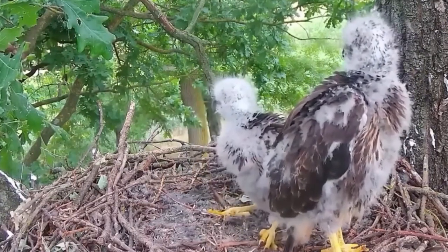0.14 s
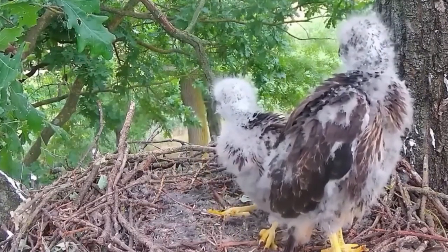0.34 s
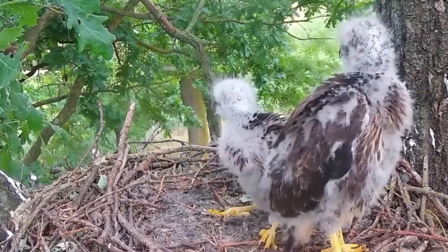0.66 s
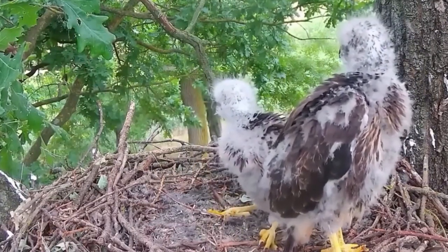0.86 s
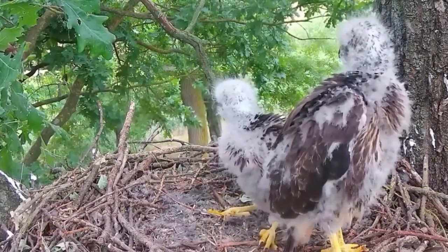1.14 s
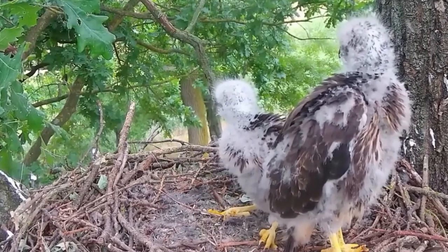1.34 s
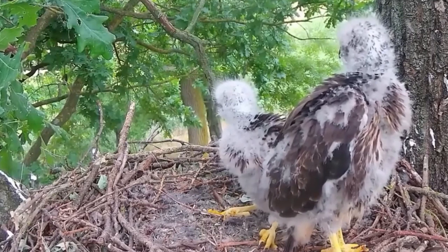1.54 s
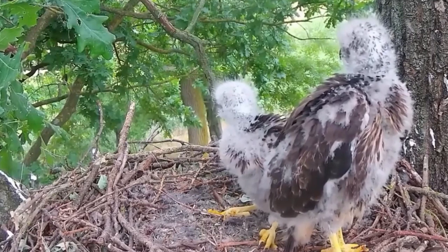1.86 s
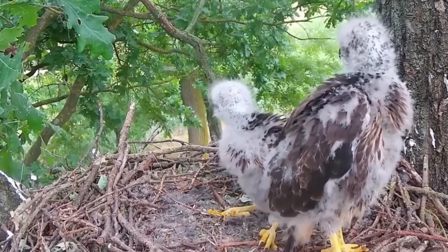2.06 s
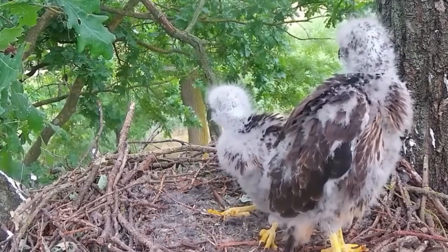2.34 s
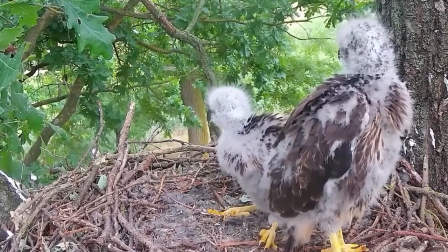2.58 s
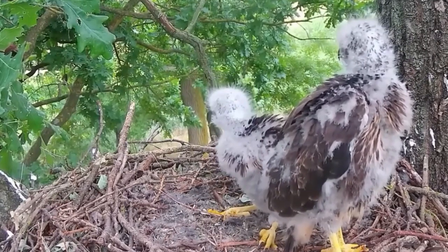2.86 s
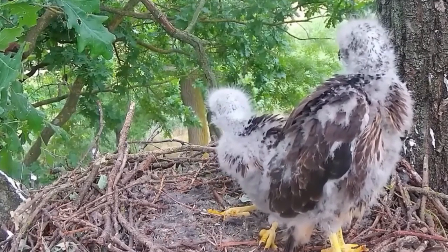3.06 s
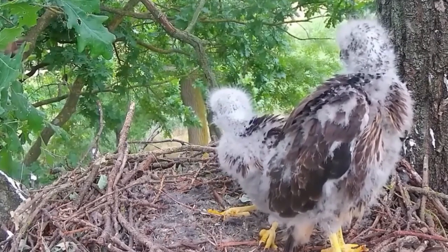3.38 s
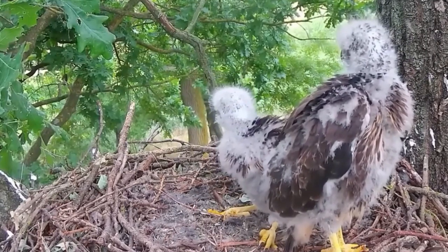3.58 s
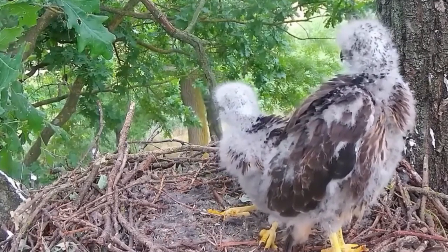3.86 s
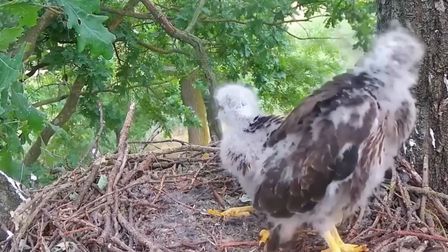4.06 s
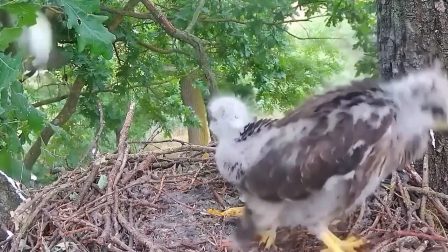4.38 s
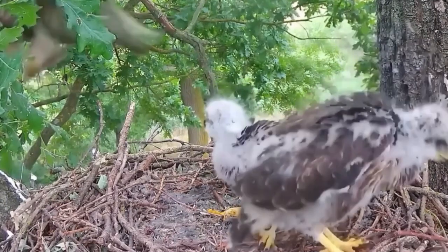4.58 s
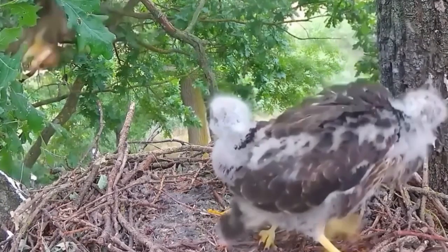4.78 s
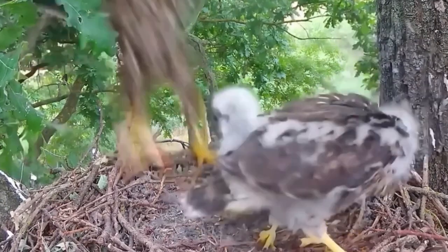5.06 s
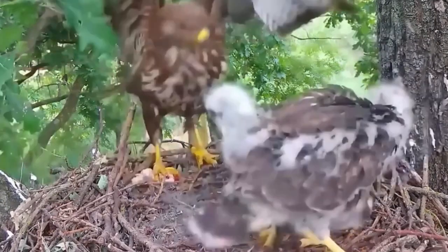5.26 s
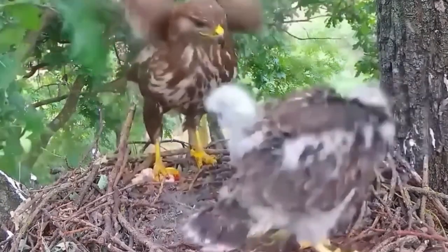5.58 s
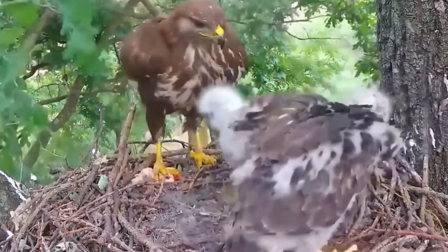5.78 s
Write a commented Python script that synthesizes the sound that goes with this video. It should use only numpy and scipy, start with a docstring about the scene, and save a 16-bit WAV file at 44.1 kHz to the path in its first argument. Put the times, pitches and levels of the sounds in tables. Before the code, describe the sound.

Close to a small microphone at a treetop nest, young birds of prey give piercing, wheezy begging whistles and quick peeps, in runs with brief pauses. The whistles first end in falling notes, later in rough squeals. The calling gets more urgent as a parent arrives with a faint rumble of wing air, cracking twigs and two soft, dull knocks. A faint hiss of distant leaves continues throughout.

```python
"""Thin whistles and short peeps, very close: two raptor chicks beg in a stick nest high in a tree.
One draws long whistles that rise, hold, then break downwards, later into a hoarse squeal.
Breath hisses under the calls; twigs crack and the nest knocks dully as a parent lands.
The small microphone at the nest picks up wing gusts, a short echo off leaves and trunk,
and quiet woodland behind."""
import sys
import numpy as np
from scipy import signal
from scipy.io import wavfile

SR = 44100
rng = np.random.default_rng(int(sys.argv[2]) if len(sys.argv) > 2 else 0)


def materialize(psi):
    """Save the field psi as 16-bit PCM at rate SR to the path in sys.argv[1].

    A 1-D psi becomes a single channel; in a 2-D psi each row is a channel.
    """
    bounded = np.clip(np.atleast_2d(psi).T, -1, 1)
    quanta = np.round(bounded * 32767).astype(np.int16)
    wavfile.write(sys.argv[1], SR, quanta)


N = 261513

CAPSULE_HZ, CUTOFF_HZ = 6200, 14100   # the microphone's treble step; the very top of the sound
ATTACK_S, SCOOP_S = 0.005, 0.007   # soft opening of a sound; quick scoop up to a pitch


def whistles(jitter, shimmer_db):
    """A chick's whistle is a near sine with trembling pitch and level; returns tone and octave."""
    tone, octave = np.zeros(N), np.zeros(N)
    for at, edge, hz, level_db in [*high_notes(), *low_notes()]:
        strain = (hz / 5500) ** 2   # high notes are the least steady
        phase = phase_of(hz * (1 + strain * jitter * wobble(len(hz), rate_hz=48.6)))
        tremble_db = strain * shimmer_db * wobble(len(hz), rate_hz=650)
        height = np.sqrt(2) * edge * from_db(level_db + tremble_db)
        add(tone, at, height * np.sin(phase))
        add(octave, at, height * np.sin(2 * phase))
    return tone, octave


def high_notes(climb_db_per_khz=-3, plunge_db=-15, swell_hz=300, waver_db=3.5):
    """Each note climbs to its held pitch, drifts, and may end in a steepening plunge."""
    # high whistled notes: start t/s, end t/s, climb depth/Hz, climb time/s, held f/Hz, end f/Hz,
    # plunge depth/Hz, plunge time/s, held level/dB, end level/dB
    notes = [ (0.488, 0.883, 1857.5, 0.021, 5186, 6084, 2884, 0.011, -27, -31),
             (1.333, 1.537, 1808, 0.035, 5520, 5890, -1, 0.01, -26.5, -35.5),
             (1.561, 1.74, 13, 0.018, 5450, 5770, 2399, 0.012, -25, -15.5),
             (2.203, 2.564, 1941.5, 0.024, 5290, 5500, 2395, 0.009, -22, -29.5),
             (3.066, 3.412, 1954, 0.037, 5214, 5640, -7, 0.01, -24, -29),
             (3.411, 3.497, 502, 0.01, 6320, 5960, 3103.5, 0.013, -27.5, -35),
             (3.9, 4.131, 1752, 0.037, 5030, 5750, -5, 0.01, -23, -28),
             (4.128, 4.278, 4, 0.02, 5480, 5305, 2197, 0.009, -30, -25.5),
             (5.155, 5.317, 1405, 0.021, 5250, 5490, -1, 0.01, -24, -43),
             (5.303, 5.543, 121, 0.029, 5430, 5117, 1895, 0.006, -22, -13.5), ]
    for start, end, climb_hz, climb_s, hold_hz, end_hz, plunge_hz, plunge_s, hold_db, end_db in notes:
        at, edge, t = call_window(start, end, fade_s=0.00036)
        progress = t / (end - start)
        below = climb_hz * np.exp(-t / climb_s)
        plunge = plunge_hz * np.exp(-(end - start - t) / plunge_s)
        hz = hold_hz + (end_hz - hold_hz) * progress - below - plunge
        held_db = hold_db + (end_db - hold_db) * progress + climb_db_per_khz * below / 1000
        swell = np.tanh((plunge / swell_hz) ** 4)   # as the pitch gives way, the level goes to plunge_db
        drift_db = (1 - swell) * waver_db * wobble(len(t), rate_hz=12)
        level_db = held_db + (plunge_db - held_db) * swell + throat_db(hz) + drift_db
        yield at, edge * np.clip(t / ATTACK_S, 0, 1), hz, level_db


def low_notes(shelf_hz=3747, scoop_hz=278, sag_hz_per_s=3000, fall_loss_db=6):
    """Each note scoops up to a sagging shelf of pitch, then slides down, coloured by the throat."""
    # clear notes after a break: start t/s, fall t/s, end t/s, end f/Hz, bend of the fall, level/dB
    notes = [(-0.04, 0.062, 0.088, 2850, 1.2, -19), (0.886, 0.965, 1.04, 2100, 1.3, -14),
             (1.741, 1.815, 1.89, 2060, 1.2, -15.5), (2.565, 2.668, 2.698, 2700, 1.2, -14)]
    for start, knee, end, end_hz, bend, level_db in notes:
        at, edge, t = call_window(start, end, fade_s=0.0026)
        fall = np.clip((t + start - knee) / (end - knee), 0, 1)
        shelf = shelf_hz - scoop_hz * np.exp(-t / SCOOP_S) - sag_hz_per_s * t
        hz = shelf + (end_hz - shelf) * fall ** bend
        yield at, edge, hz, level_db - fall_loss_db * fall + throat_db(hz)


def throat_db(hz):
    """Throat and beak lift or dim a note as it glides through their resonances."""
    # peaks and a notch: centre f/Hz, width/Hz, gain/dB
    resonances = [(2580, 150, 5), (4200, 280, 11), (4880, 170, -9)]
    return sum(gain_db * np.exp(-((hz - centre) / width) ** 2) for centre, width, gain_db in resonances)


def squeals(jitter, shimmer_db, hiss_db):
    """The syrinx drops to low, uneven cycles whose fluttering partials take turns to lead."""
    # hoarse turns: t/s, length/s, start f/Hz, end f/Hz, voicing, roughness 0-1, level/dB
    turns = [ (2.696, 0.047, 1320, 1055, "middle", 0.02, -10), (3.497, 0.057, 1250, 1090, "upper", .6, -12),
             (3.554, 0.06, 1330, 1060, "middle", .4, -9), (4.276, 0.02, 1200, 1050, "upper", .6, -10),
             (4.296, 0.02, 1230, 1040, "middle", 1, -8), (4.752, 0.008, 1150, 1000, "upper", .6, -8),
             (4.759, 0.016, 1170, 1000, "middle", 1, -6), (5.047, 0.018, 1170, 1010, "middle", 1, -9),
             (5.543, 0.023, 1190, 1185, "upper", .4, -9), (5.566, 0.038, 1240, 1250, "middle", .9, -11),
             (5.604, 0.034, 1205, 1110, "upper", .5, -12), (5.638, 0.118, 1300, 1215, "middle", 1, -9.5),
             (5.756, 0.022, 1170, 1160, "even", .8, -12.5), (5.778, 0.025, 1200, 1210, "even", .9, -16.5),
             (5.803, 0.025, 1130, 1000, "even", .8, -15), ]
    # by voicing: partials 1-4 at full roughness, level/dB relative to the turn
    voicings = {"upper": (-20, -15, 0, -24), "middle": (-10, 0, -15, -20), "even": (0, -1, -4, -18)}
    # by voicing: exponent that sets how late the pitch gives way
    droop_bend = {"upper": 3.5, "middle": 1.61, "even": 1.5}
    # by voicing: share of the pitch missing at the start
    scoop = {"upper": 0.06, "middle": 0, "even": 0}
    # by voicing: loss/dB over one turn
    loss_db = {"upper": 0, "middle": 7, "even": 3}
    out, effort = np.zeros(N), np.zeros(N)
    for start, length, start_hz, end_hz, voicing, rough, turn_db in turns:
        at, edge, t = call_window(start, start + length, fade_s=0.0025)
        hz = start_hz + (end_hz - start_hz) * (np.maximum(t, 0) / length) ** droop_bend[voicing]
        hz = hz * (1 - scoop[voicing] * np.exp(-t / SCOOP_S))
        phase = phase_of(hz * (1 + rough * jitter * wobble(len(t), rate_hz=215)))
        fading_db = turn_db - loss_db[voicing] * t / length
        for k, side_db in enumerate(voicings[voicing], 1):
            # side partials grow with roughness and rasp more than the leading one
            partial_db = side_db + 20 * np.log10(rough) if side_db else 0
            flutter_db = rough * shimmer_db * wobble(len(t), rate_hz=62)
            height = np.sqrt(2) * edge * from_db(fading_db + partial_db + flutter_db)
            rasp = (.7 if side_db else .33 * rough) * wobble(len(t), rate_hz=210)
            add(out, at, height * (1 + rasp) * np.sin(k * phase))
            add(effort, at, rough * height)
    turbulence = from_db(hiss_db) * effort * rms_one(band(rng.standard_normal(N), 1500, 4600))
    return band(out + turbulence, 900, CAPSULE_HZ, order=4)   # the small body radiates no bass


def peeps(shimmer_db, jitter, lean, throat_share):
    """Each peep is one straight glide under a swell that opens faster than it closes."""
    # short peeps: t/s, length/s, start f/Hz, end f/Hz, level/dB
    glides = [(0.096, 0.014, 4290, 2910, -22), (0.193, 0.035, 3450, 4290, -32),
              (0.395, 0.034, 2680, 2890, -24), (0.39, 0.038, 3570, 5520, -22.5),
              (0.485, 0.057, 3350, 3520, -20), (0.68, 0.019, 2900, 3080, -19.5),
              (0.434, 0.01, 3740, 4750, -29), (0.522, 0.037, 3380, 2760, -24.5),
              (0.556, 0.03, 2400, 2920, -28.5), (0.703, 0.048, 2370, 2805, -28.5),
              (0.782, 0.016, 4270, 3730, -27.5), (1.932, 0.076, 2417, 2910, -31),
              (2.028, 0.078, 2820, 3220, -31), (2.577, 0.067, 2280, 2930, -29.5),
              (3.29, 0.042, 4230, 3620, -31), (1.279, 0.035, 4840, 3270, -29.5),
              (1.622, 0.022, 2600, 3700, -19), (1.648, 0.02, 2660, 3600, -21),
              (1.57, 0.085, 4050, 4350, -29), (1.677, 0.032, 3440, 5100, -28),
              (1.93, 0.017, 3730, 5260, -24), (2.001, 0.038, 3626, 2420, -18.5),
              (2.363, 0.081, 3700, 4990, -25), (3.006, 0.052, 3510, 5270, -25),
              (3.191, 0.03, 4390, 4580, -28), (3.194, 0.046, 2860, 3015, -20),
              (3.396, 0.028, 3720, 5300, -21.5), (3.674, 0.034, 3480, 5500, -25),
              (3.9, 0.081, 2810, 3516, -18), (3.985, 0.017, 3860, 4700, -22.5),
              (4.12, 0.1, 2740, 3480, -21), (4.201, 0.027, 3790, 4850, -23),
              (4.469, 0.027, 3240, 5740, -20.5), (4.522, 0.053, 3094, 5270, -18),
              (4.566, 0.026, 4930, 3500, -20.5), (4.647, 0.022, 3470, 5240, -16),
              (4.614, 0.037, 5500, 6800, -29), (4.737, 0.02, 5390, 3145, -12),
              (4.845, 0.028, 3260, 5500, -24), (4.906, 0.011, 5320, 3200, -19.5),
              (4.915, 0.03, 3206, 5110, -14), (5.009, 0.03, 3470, 5300, -18),
              (5.03, 0.018, 6270, 2920, -8.5), (5.08, 0.0097, 4450, 3000, -18),
              (5.249, 0.3, 3397, 3535, -29.5), (5.361, 0.01, 3520, 4400, -18),
              (5.848, 0.018, 4300, 3030, -26)]
    out = np.zeros(N)
    for start, length, start_hz, end_hz, level_db in glides:
        progress = np.linspace(0, 1, int(length * SR))
        hz = start_hz + (end_hz - start_hz) * progress
        hz = hz * (1 + jitter * wobble(len(hz), rate_hz=300))
        tremble_db = shimmer_db * wobble(len(hz), rate_hz=430)
        height = np.sqrt(2) * from_db(level_db + throat_share * throat_db(hz) + tremble_db)
        swell = np.sin(np.pi * progress ** lean)
        add(out, int(start * SR), height * swell * np.sin(phase_of(hz)))
    return out


def breath(spread):
    """Each wheeze is noise in three neighbouring windpipe resonances that flare on their own."""
    # wheezes under the calls: t/s, length/s, centre f/Hz, level/dB of each resonance
    wheezes = [(0.369, 0.11, 3370, -39.5), (0.5, 0.405, 3570, -37.5), (1.612, 0.3, 3320, -36),
               (1.917, 0.15, 3380, -37.5), (2.238, 0.51, 4960, -45), (3.105, 0.32, 3180, -39),
               (3.914, 0.19, 3820, -38.5), (4.092, 0.23, 4460, -30.5), (4.591, 0.21, 4880, -31.5),
               (5.187, 0.43, 3950, -34), (1.534, 0.053, 5370, -40), (3.131, 0.091, 5060, -31),
               (3.466, 0.068, 4640, -31), (4.132, 0.19, 6200, -34), (4.63, 0.135, 6200, -38)]
    out, half_band = np.zeros(N), np.sqrt(spread)
    for start, length, hz, level_db in wheezes:
        size = int(length * SR)
        swell = np.abs(np.sin(np.linspace(0, np.pi, size))) ** 0.43
        for centre in (hz / spread, hz, hz * spread):
            noise = rms_one(band(rng.standard_normal(size), centre / half_band, centre * half_band))
            flare_db = 4 * wobble(size, rate_hz=25)
            add(out, int(start * SR), swell * from_db(level_db + flare_db) * noise)
    return out


def twigs(t60_s):
    """Twigs crack under claws beside the microphone: bursts of grainy noise that die fast."""
    # cracks: t/s, level/dB ahead of the band filter
    cracks = [(1.554, -26.5), (3.893, -10), (4.99, -24.5), (5.19, -16.5), (5.214, -14), (5.234, -15.5)]
    out, t = np.zeros(N), np.arange(SR // 8) / SR
    for start, level_db in cracks:
        grains = rng.standard_normal(len(t)) * from_db(3.3 * wobble(len(t), rate_hz=74))
        add(out, int(start * SR), from_db(level_db - 60 * t / t60_s) * grains)
    return band(out, 870, 3500)


def knocks():
    """The parent's feet land and ring the low modes of the nest with a soft, dull knock."""
    # footfalls: t/s, level/dB of each mode
    footfalls = [(5.234, -32), (5.612, -31)]
    # modes of the stick nest: f/Hz, t60/s
    modes = [(205, 0.09), (430, 0.16)]
    out, t = np.zeros(N), np.arange(SR // 8) / SR
    for start, level_db in footfalls:
        ring = sum(from_db(level_db - 60 * t / t60) * np.sin(2 * np.pi * hz * t) for hz, t60 in modes)
        add(out, int(start * SR), ring * np.clip(t / ATTACK_S, 0, 1))
    return out


def canopy(x, echo_db, t60_s):
    """Dense scattered echoes from the trunk, branches and leaves around the nest."""
    t = np.arange(SR // 2) / SR
    tail = rng.standard_normal(len(t)) * from_db(-60 * t / t60_s) * np.clip(t / 0.014, 0, 1)
    tail = band(tail, 2400, CAPSULE_HZ)   # leaves scatter only the short waves
    return from_db(echo_db) * signal.fftconvolve(x, tail / np.sqrt(np.sum(tail ** 2)))[:N]


def capsule(x, overload):
    """The capsule overloads and loses treble above the whistles; returns sound and excess peaks."""
    excess = x - np.clip(x, -overload, overload)
    clipped = x - signal.sosfilt(signal.butter(1, 500, "high", fs=SR, output="sos"), excess)
    return signal.sosfilt(signal.butter(10, CAPSULE_HZ, fs=SR, output="sos"), clipped), excess


def sheen(octave, peaks, wheeze, sheen_db, crackle_over_sheen_db):
    """A faint sheen an octave above the whistles, a crackle on the loudest peaks, a breathy high hiss."""
    crackle = from_db(crackle_over_sheen_db) * peaks
    hiss = from_db(-5) * band(wheeze, CAPSULE_HZ, 8000)
    return from_db(sheen_db) * band(octave + crackle, 9000, CUTOFF_HZ) + hiss


def gusts():
    """Air stirred by wings rumbles in lumps on the capsule."""
    # course of the rumble: t/s, level/dB
    course = [(0, -60), (3.7, -57.5), (4.6, -45.5), (5.2, -51)]
    gain = from_db(np.interp(np.arange(N) / SR, *np.transpose(course)))
    rumble = band(rng.standard_normal(N), 12, 45)
    lumps = from_db(5 * wobble(N, rate_hz=6))
    return gain * rms_one(rumble * lumps)


def woods(level_db, flicker_db):
    """Distant leaves and microphone hiss: half-octave noise bands that flicker a little."""
    # colour of the background: f/Hz, relative level/dB
    spectrum = [(20, -17), (100, -5), (450, -7), (1600, -9.5), (3500, -8.5), (5500, -27.5), (7000, -9.5),
                (9000, -27), (13000, -20)]
    hz, colour_db = np.transpose(spectrum)
    edges = 20 * 2 ** np.arange(0, 9.6, .5)
    out, white = np.zeros(N), rng.standard_normal((2, N))
    for k, (low, high) in enumerate(zip(edges, edges[1:])):
        band_db = np.interp(np.log(low * high) / 2, np.log(hz), colour_db)
        out += from_db(band_db + flicker_db * wobble(N, rate_hz=10.7)) * band(white[k % 2], low, high)
    return from_db(level_db) * rms_one(out)


def from_db(db):
    return 10 ** (np.asarray(db) / 20)


def rms_one(x):
    return x / np.sqrt(np.mean(x ** 2) + 1e-20)


def phase_of(hz):
    return 2 * np.pi * np.cumsum(hz) / SR


def band(x, low_hz, high_hz, order=2):
    return signal.sosfilt(signal.butter(order, [low_hz, high_hz], "band", fs=SR, output="sos"), x)


def wobble(size, rate_hz):
    """Smooth random drift with an RMS of 1."""
    r = np.exp(-2 * np.pi * rate_hz / SR)
    return rms_one(signal.lfilter([1], [1, -2 * r, r * r], rng.standard_normal(size + 4000))[4000:])


def call_window(start_s, end_s, fade_s):
    """First sample, faded window and seconds since the start of one call."""
    at = int(max(start_s, 0) * SR)
    t = np.arange(at, int(end_s * SR)) / SR
    return at, np.clip(np.minimum(t - start_s, end_s - t) / fade_s, 0, 1), t - start_s


def add(out, at, sound):
    out[at:at + len(sound)] += sound[:N - at]


def scene():
    """One microphone at the nest: chicks and sticks up close, the woods far behind."""
    tone, octave = whistles(jitter=0.0083, shimmer_db=2.0)
    hoarse = squeals(jitter=.012, shimmer_db=1, hiss_db=-18)
    wheeze = breath(spread=1.25)
    peeping = peeps(shimmer_db=2.5, jitter=.015, lean=.7, throat_share=0.4)
    nest = tone + hoarse + peeping + wheeze + twigs(t60_s=0.12) + knocks()
    nest = nest + canopy(nest, echo_db=-20, t60_s=.15)
    close, peaks = capsule(nest, overload=.74)
    top = sheen(octave, peaks, wheeze, sheen_db=-39, crackle_over_sheen_db=9)
    return (close + top + woods(level_db=-43.5, flicker_db=1.8) + gusts())[None]


def record(dry):
    """The top treble is cut steeply."""
    return signal.sosfilt(signal.cheby2(16, 60, CUTOFF_HZ, fs=SR, output="sos"), dry)


dry = scene()
out = record(dry)
materialize(out)
```